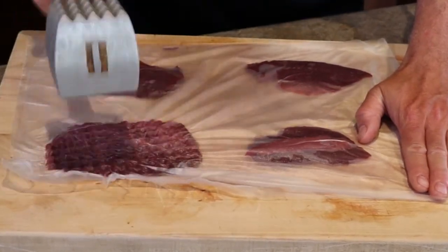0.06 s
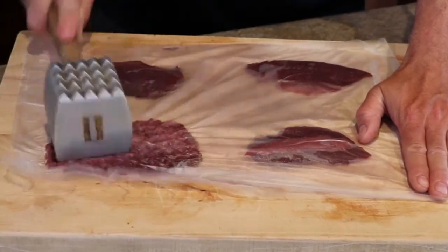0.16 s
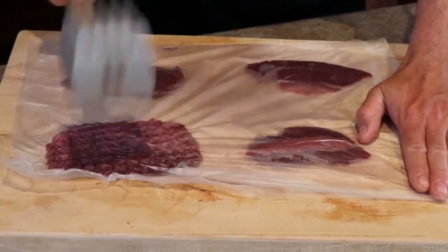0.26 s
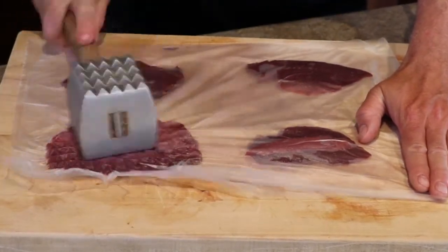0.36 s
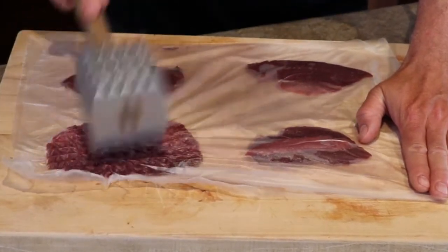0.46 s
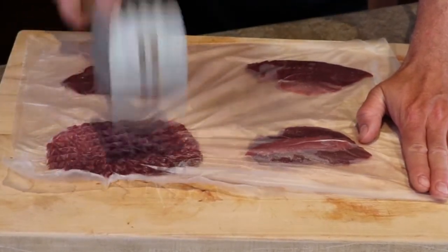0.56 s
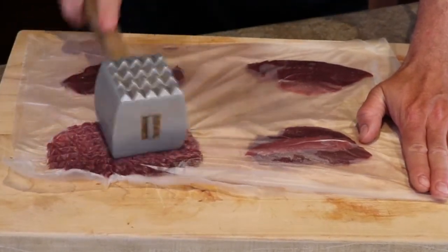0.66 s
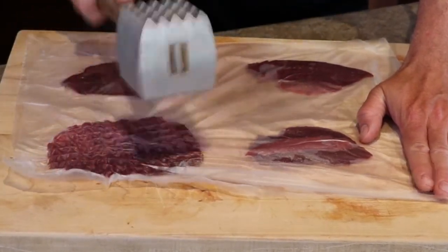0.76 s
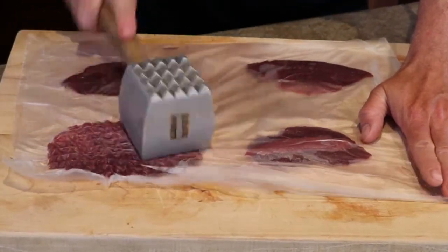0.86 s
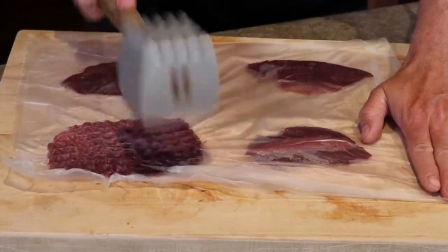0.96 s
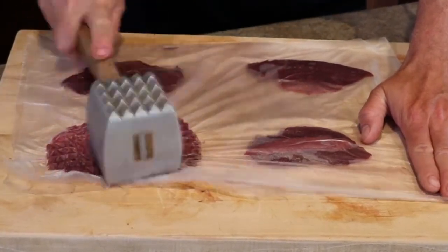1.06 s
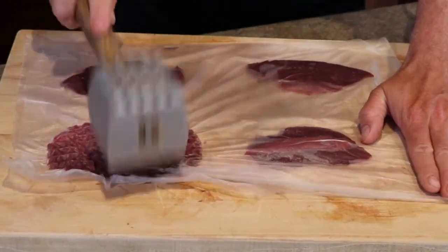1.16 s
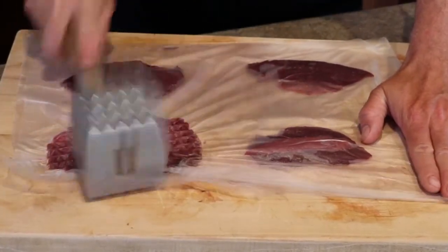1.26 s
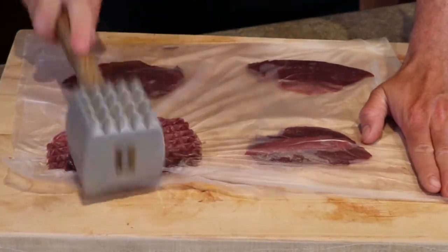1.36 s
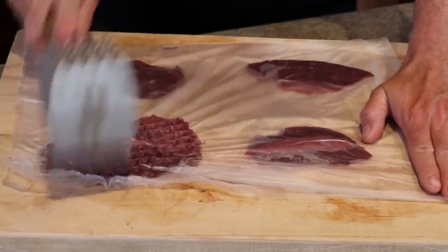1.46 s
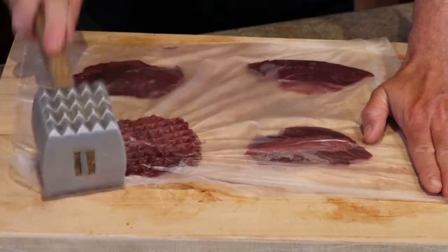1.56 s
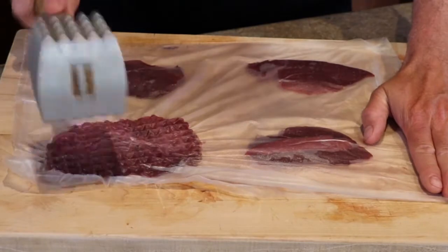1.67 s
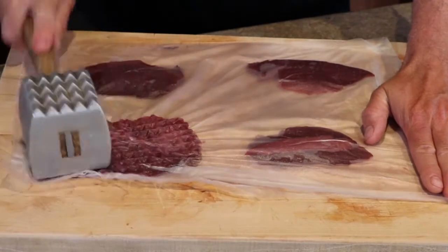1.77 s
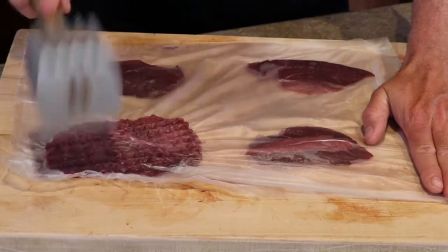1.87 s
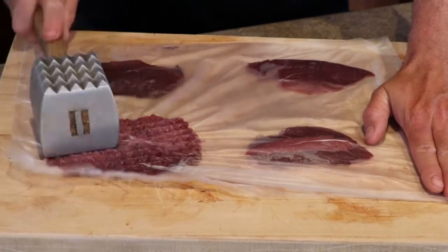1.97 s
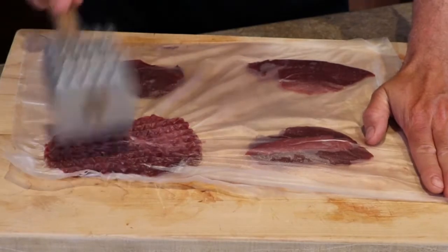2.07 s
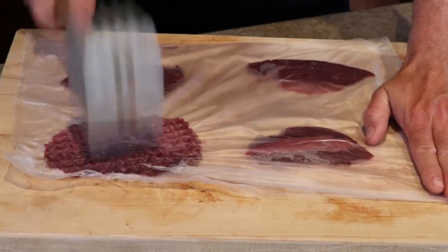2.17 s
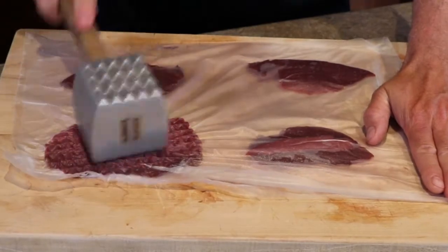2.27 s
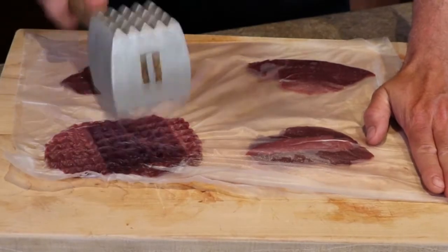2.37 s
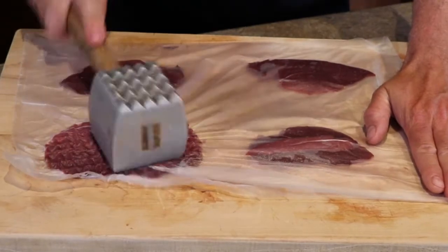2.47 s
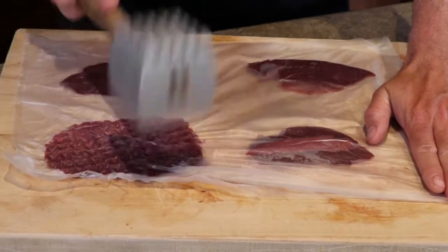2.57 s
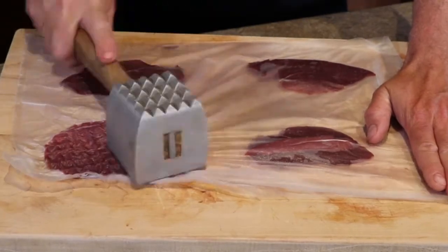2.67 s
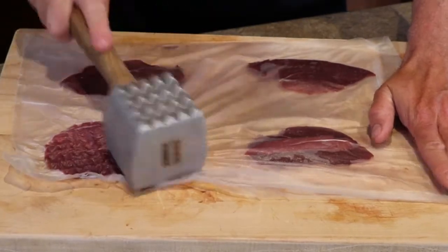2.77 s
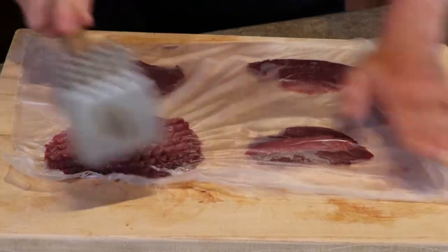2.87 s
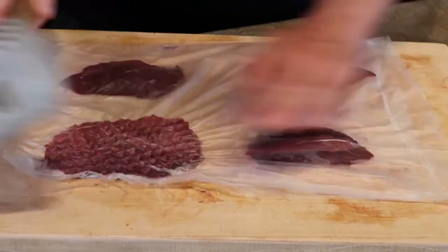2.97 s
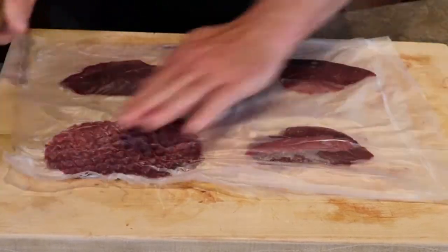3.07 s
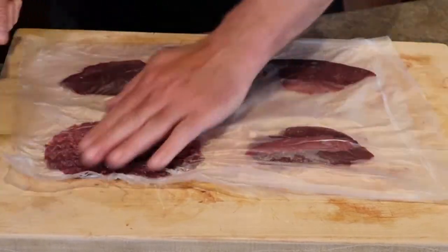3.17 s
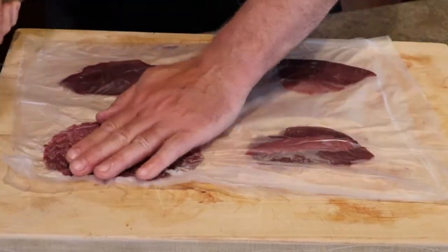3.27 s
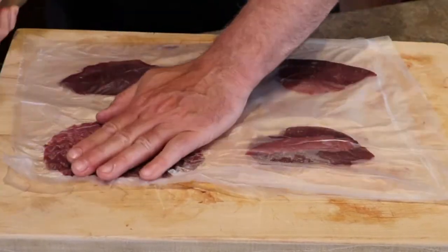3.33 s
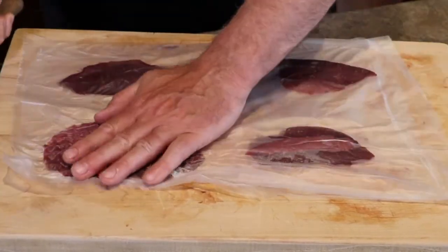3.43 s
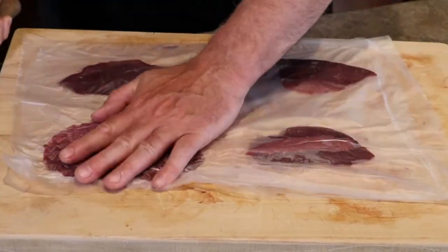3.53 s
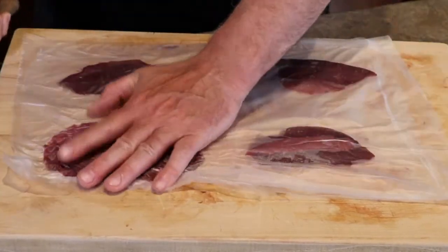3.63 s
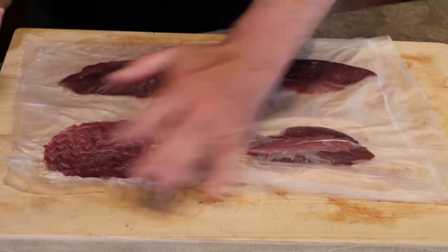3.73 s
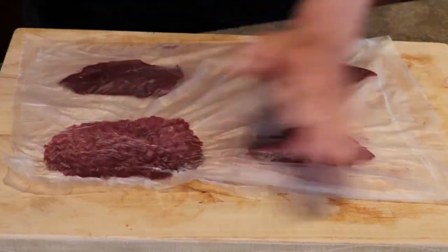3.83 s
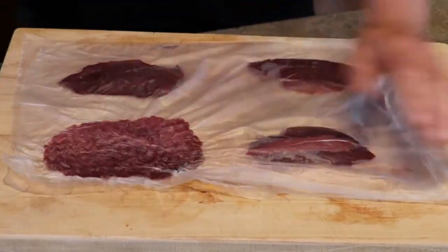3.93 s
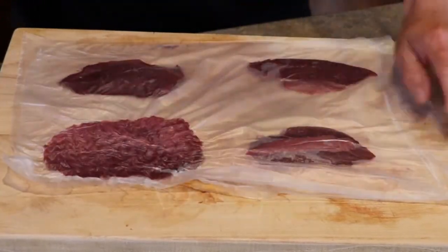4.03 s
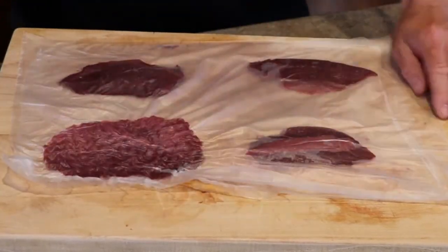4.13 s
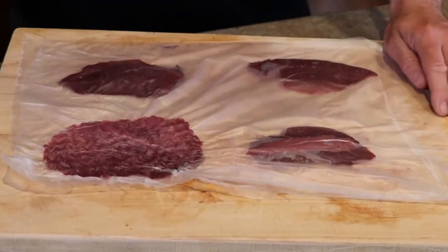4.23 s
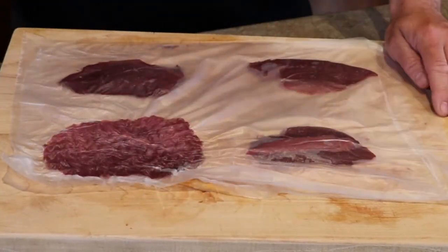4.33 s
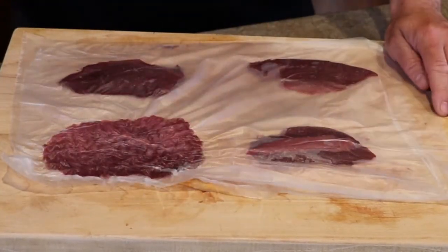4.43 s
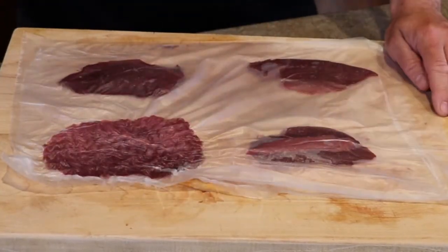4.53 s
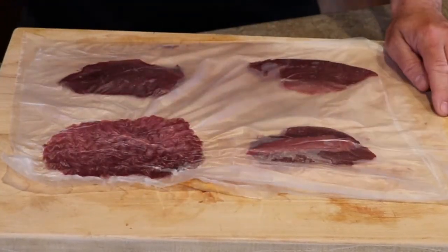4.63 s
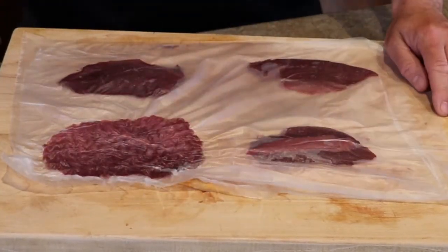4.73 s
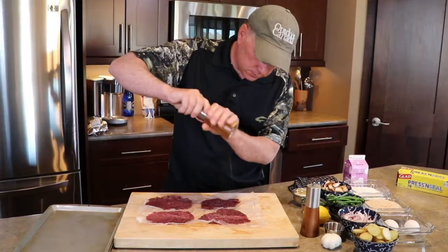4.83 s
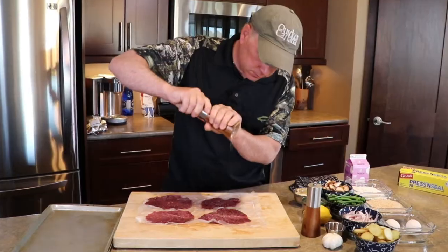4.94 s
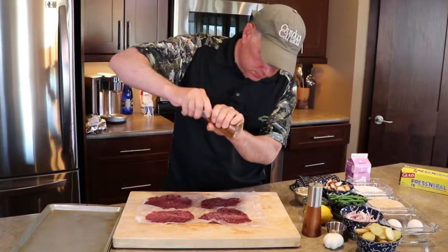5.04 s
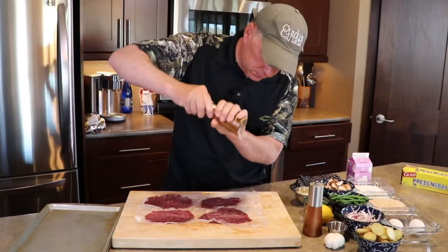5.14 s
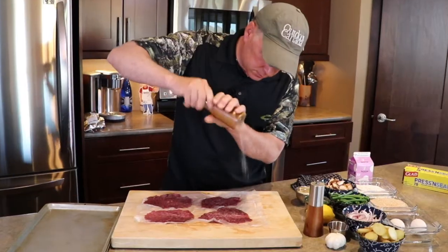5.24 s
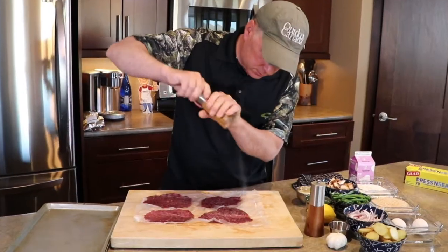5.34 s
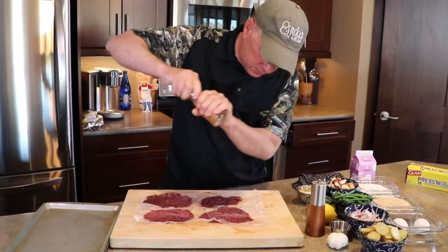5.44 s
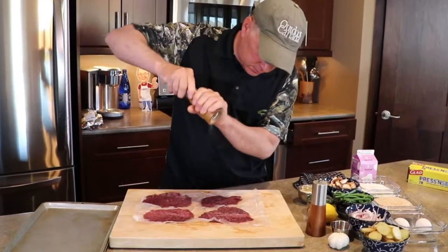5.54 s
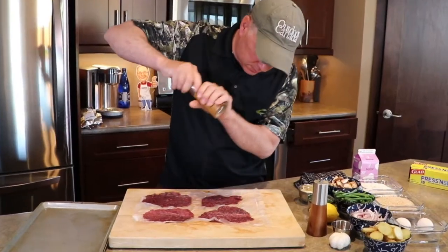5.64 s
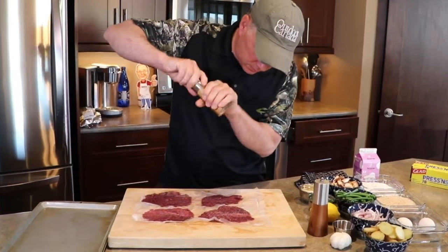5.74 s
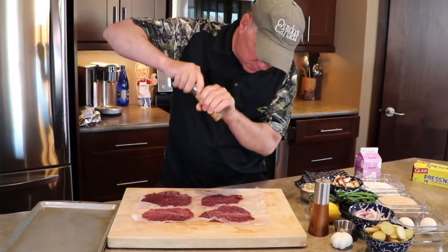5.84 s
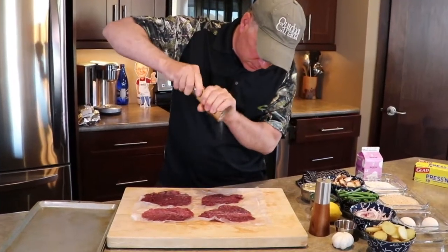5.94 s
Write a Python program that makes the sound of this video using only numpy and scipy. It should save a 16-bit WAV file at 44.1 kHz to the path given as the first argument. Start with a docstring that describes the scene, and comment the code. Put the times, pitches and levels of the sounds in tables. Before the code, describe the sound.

From the start, a toothed metal mallet pounds meat under plastic film on a wooden board: about a dozen hard, even blows, a little over four per second, the last at 2.7 seconds. Each combines a smack, a woody knock and a short metallic ring, with a faint wet squelch as the teeth lift. The blows overload the microphone, so the kitchen's reverberation ducks and swells back after each one. From about 2.9 seconds the film gives small, sharp snaps; between 3.3 and 3.8 a hand presses it flat with a much quieter crinkle and soft squish, and a few ticks trail off by 4.3. After a short lull, a pepper mill turns twice, cracking peppercorns crisply at about 5.0 to 5.1 and 5.8 to 5.9 seconds, with light gritty rubbing in between. Faint room hiss and appliance hum lie underneath throughout.

```python
"""Hard, ringing blows in a live kitchen, then crinkling film, then two turns of a pepper mill.
A toothed metal mallet pounds duck under plastic film on a wooden board; board and head ring.
The blows overload the microphone; its limiter ducks their reverberation, which swells back each time.
A hand presses the film flat, snapping its creases, and the mill's burrs crack peppercorns."""
import sys
import numpy as np
from scipy import signal
from scipy.io import wavfile

SR = 44100
rng = np.random.default_rng(int(sys.argv[2]) if len(sys.argv) > 2 else 0)


def file_out(sig):
    """Save sig as 16-bit WAV at sys.argv[1]."""
    # one column per channel
    cols = np.atleast_2d(sig).T
    # limit, then scale
    lim = np.clip(cols, -1, 1)
    pcm = np.round(lim * 32767).astype(np.int16)
    wavfile.write(sys.argv[1], SR, pcm)


N = 264600
TIME_S = np.arange(N) / SR
LEAD_IN_SAMPLES = round(.1 * SR)  # the first blow lands before time zero

# Spectra. Each row: frequency in Hz, relative density in dB.
AIR_SPECTRUM = [(15, -33), (25, -6.5), (263, -7.5), (344, -9.5), (476, -7), (575, -7), (695, -10.5),
                (754, -13), (936, -13), (1290, -14.5), (4610, -25), (6920, -24.5), (9320, -25.5),
                (16000, -31.5)]  # room hiss
RUMBLE_SPECTRUM = [(15, -7), (35, -6), (80, -6), (140, -13.5), (250, -20), (1000, -64)]  # hands turning the mill
JOLT_SPECTRUM = [(30, -14), (70, 4), (120, 5), (200, -15), (350, 0), (1000, -41)]  # a crack jolting the hands
GRIT_SPECTRUM = [(200, -6), (1000, -23), (2200, -11), (3500, -4), (6000, 4), (9000, 1.5), (12500, 0.5),
                 (16000, -19)]  # grit between the burrs
MILL_BODY_SPECTRUM = [(50, -18), (130, -3), (300, -15), (520, -13), (700, -6.5), (890, -2), (1150, -5.5),
                      (1600, -5), (2100, 6.5), (2600, -1), (4000, -8), (16000, -32)]  # the mill's wooden body
CRACK_SPECTRUM = [(300, -7), (1500, -9), (2300, 4), (4000, -3), (8000, 6.5), (12000, 0), (16000, -6)]  # a peppercorn breaking
FILM_SPECTRUM = [(1470, -21), (2500, -32), (2990, -17), (3770, -19), (4080, -6), (5650, 1.5), (7020, 3.5),
                 (8940, -3), (15200, -11.5), (16000, -13)]  # plastic film crinkling
SQUISH_SPECTRUM = [(500, -5.5), (1000, -4), (1500, 7), (2200, 2.5), (3500, -2.5), (6000, -10),
                   (16000, -44.5)]  # meat under the palm
SQUELCH_SPECTRUM = [(300, -6), (1200, -5.5), (2000, 6.5), (3300, -1.5), (5000, -8.5), (8000, -17),
                    (16000, -40.5)]  # meat letting go of the teeth
SMACK_SPECTRUM = [(40, -22), (150, 0), (400, 6), (620, 2.5), (1000, -2), (1220, -5.5), (1490, -4),
                  (2050, -7.5), (3200, -18.5), (5000, -22), (7500, -25), (12000, -34.5), (16000, -60)]  # meat and film squashed on wood
REVERB_SPECTRUM = [(60, 7.6), (300, 2.1), (900, 5.8), (2000, 2.2), (5000, 2.65), (9000, 6.3),
                   (16000, 11.26)]  # kitchen reflections

# Appliance hum. Each row: frequency in Hz, relative level in dB.
HUM_TONES = [(59.5, -62.5), (247.6, -67), (414.5, -63.5), (473.7, -62)]
# Kitchen decay. Each row: frequency in Hz, T60 in seconds.
REVERB_T60 = [(60, 0.5), (250, 0.5), (700, 0.66), (2000, 0.71), (5000, 0.68), (9000, 0.334), (16000, 0.283)]
# Standing waves. Each row: frequency in Hz, relative level in dB.
KITCHEN_MODES = [(119, 9), (238, 1.5), (298, 3.5), (337, 1), (383, -0.5), (517, -6), (563, 0.5), (592, 1),
                 (618, -10), (642, 4), (817, -2), (884, 2), (1028, 7), (1060, -9.5), (1128, -7), (1432, 8),
                 (1487, 0), (1530, 1), (1870, -21)]
# Nearby surfaces. Each row: delay in seconds, gain in dB.
ECHOES = [(.0063, -17.5), (0.01, -16), (0.013, -7.5), (.0192, -20.5), (0.024, -18)]
# Hands turning the mill. Each row: start and length in seconds, relative rumble in dB.
MILL_GRIPS = [(5.338, 0.25, -45), (5.862, 0.042, -38.5)]
# Mill strokes. Each row: start and length in seconds, relative hiss and crunch in dB.
MILL_TWISTS = [(5.042, 0.014, -37, -35.5), (5.104, 0.024, -41, -25.5), (5.384, 0.099, -41, -56),
               (5.552, 0.03, -46.5, -64), (5.728, 0.05, -41.5, -55), (5.87, 0.032, -37, -30.5),
               (5.935, 0.045, -41.5, -52)]
# Loudest peppercorns. Each row: start in seconds, relative peaks of snap and body knock in dB.
CORN_CRACKS = [(5.009, -22, -40), (5.0415, -18.5, -41), (5.0482, -21, -23.5), (5.059, -24, -35),
               (5.0905, -20, -20.5), (5.1008, -16, -12.5), (5.1108, -29, -22), (5.1286, -13, -33),
               (5.3542, -29.5, -54), (5.4584, -40, -35), (5.8177, -31, -58), (5.8517, -28, -34),
               (5.863, -34, -22), (5.871, -14, -19.5), (5.8959, -24, -21.5), (5.916, -16, -42)]
# The hand lands, pushes, rests, lifts, settles and shifts.
# Each row: start and length in seconds, relative crinkle and squish in dB.
HAND_TOUCHES = [(3.283, 0.045, -39, -45.5), (3.329, 0.032, -32, -41), (3.385, 0.42, -40.5, -51.5),
                (3.77, 0.0094, -31, -41), (4.177, 0.03, -47.5, -49), (4.266, 0.0022, -63, -54)]
# Loudest creases. Each row: start in seconds, relative peak in dB.
FILM_CREASES = [(2.9404, -26), (3.1907, -34), (3.2794, -13.5), (3.3011, -26), (3.328, -19), (3.4037, -20),
                (3.6733, -24), (3.829, -33), (3.9943, -30.5)]
# Board and mallet modes. Each row: frequency in Hz, relative level in dB, T60 in seconds.
STRUCK_MODES = [(68.3, -25, 0.31), (121, -23, 0.24), (181.5, -15.5, .09), (239, -19, 0.11),
                (291.8, -10.5, 0.11), (337.1, -5.5, 0.085), (387.6, -8, 0.06), (503.3, -12, 0.054),
                (525, -10, 0.15), (609.6, -9, 0.067), (807.3, -10, 0.08), (952, -14, 0.055),
                (1093, -23, 0.077), (1393, -20.5, 0.14), (1526.4, -3.5, 0.045), (1910, -15, 0.047),
                (2803, -22, 0.031), (3553, -19.5, 0.021)]
# Blows: thin meat lets the board knock, teeth reaching wood ring the head, wet meat clings.
# Each row: start in seconds, then relative force, board knock, head ring and wet peel in dB.
MALLET_BLOWS = [(-0.075, 1, 2, -3.5, -47), (0.168, 0.5, -5, -13.5, -42), (0.4049, 0.1, -8, -11.5, -67),
                (0.6432, 0, -0.5, -0.5, -45), (0.8674, -0.5, 6, -0.5, -46), (1.1008, -3.5, 1.5, 3.5, -41),
                (1.3245, -3, -3.5, 8.5, -40.5), (1.546, -2.5, 2.5, 7.5, -43), (1.7767, -4.5, 2, -1.5, -54),
                (2.0006, -1, -1.5, -8, -44), (2.2382, -1, -7.5, 3.5, -41), (2.4637, -5, 1, -1, -67),
                (2.709, 0.5, 4.5, -0.5, -36)]
# Output level. Each row: time in seconds, gain in dB.
OUTPUT_GAIN = [(2.2, 0), (2.46, 1.3), (2.71, 2.6)]


def amp(db):
    return 10 ** (np.asarray(db) / 20)


def unit_rms(x):
    return x / np.sqrt(np.mean(x ** 2) + 1e-20)


def log_interp(points, hz):
    """Curve value on a log-frequency axis."""
    points_hz, values = np.transpose(points)
    return np.interp(np.log(hz + 1), np.log(points_hz + 1), values)


def add(mix, start_s, sound):
    part = mix[round(start_s * SR):][:len(sound)]
    part += sound[:len(part)]


def colour(x, spectrum, size=4096):
    """Minimum-phase filter; attacks stay sharp."""
    log_gain = np.log(amp(log_interp(spectrum, abs(np.fft.fftfreq(size, 1 / SR)))))
    taps = np.fft.ifft(np.exp(np.conj(signal.hilbert(log_gain)))).real
    return signal.oaconvolve(x, taps[:size // 2])[:len(x)]


def noise(spectrum, samples=N):
    return unit_rms(colour(rng.standard_normal(samples), spectrum))


def burst(t, decay_s):
    return rng.standard_normal(len(t)) * np.exp(-t / decay_s)


def grains(spectrum, per_s, spread_db, decay_s):
    """Dense stream of tiny, unequal snaps."""
    sizes = amp(spread_db * np.minimum(rng.exponential(1, N), 4))
    fires = rng.random(N) < per_s / SR
    power = signal.lfilter([1], [1, -np.exp(-2 / (decay_s * SR))], (sizes * fires) ** 2)
    return unit_rms(colour(np.sqrt(power) * rng.standard_normal(N), spectrum))


def snaps(spectrum, per_s, spread_db, decay_s):
    """Separate, unequal snaps at uneven intervals."""
    out, t = np.zeros(N), np.arange(SR // 80) / SR
    for k in range(int(per_s * N / SR)):
        start_s = (k + rng.random()) / per_s
        add(out, start_s, amp(spread_db * rng.uniform(-1.5, 1.6)) * burst(t, decay_s))
    return unit_rms(colour(out, spectrum))


def strokes(rows, attack_s, release_s):
    """Swell, hold, decay: one envelope per level column."""
    gains = np.zeros((len(rows[0]) - 2, N))
    for start_s, length_s, *levels_db in rows:
        near = abs(TIME_S - start_s) < length_s + .5
        t = TIME_S[near] - start_s
        shape = np.exp(np.minimum(t, 0) / attack_s - np.maximum(t - length_s, 0) / release_s)
        gains[:, near] = np.maximum(gains[:, near], amp(levels_db)[:, None] * shape)
    return gains


def room_tone(air_db=-55, hum_db=-3):
    """Soft hiss and appliance hum."""
    hum = sum(amp(db) * np.sqrt(2) * np.sin(2 * np.pi * (hz * TIME_S + rng.random()))
              for hz, db in HUM_TONES)
    return amp(air_db) * noise(AIR_SPECTRUM) + amp(hum_db) * hum


def kitchen_reverb(x, build_s=0.0069):
    """Dense reflections, each band dying at its own rate."""
    hz, t, bands = signal.stft(rng.standard_normal(SR), SR, nperseg=256)
    decay_db = 60 * t / log_interp(REVERB_T60, hz)[:, None]
    bands = bands * amp(log_interp(REVERB_SPECTRUM, hz)[:, None] - decay_db)
    tail = signal.istft(bands, SR, nperseg=256)[1][:SR]
    tail *= 1 - np.exp(-(TIME_S[:SR] / build_s) ** 2)
    return signal.fftconvolve(x, tail / np.linalg.norm(tail))[:len(x)]


def standing_waves(x):
    """The strongest room modes ring on at their own pitches."""
    hz, db = np.transpose(KITCHEN_MODES)[:, :, None]
    t = TIME_S[:SR]
    envelopes = amp(db - 60 * t / log_interp(REVERB_T60, hz))
    tail = (envelopes * np.sin(2 * np.pi * (hz * t + rng.random(hz.shape)))).sum(0)
    return signal.fftconvolve(x, tail / np.linalg.norm(tail))[:len(x)]


def first_echoes(x):
    """Counter, cabinets and cook reflect each knock and thicken it."""
    out = np.zeros(len(x))
    for delay_s, db in ECHOES:
        add(out, delay_s, amp(db) * x)
    return out


def pepper_mill(crack_db=-1, crumble_db=-10, body_db=3, jolt_db=-28):
    """Corns burst between the burrs, knock the body and jolt the hands; grit rubs in between."""
    grit = amp(-2) * grains(GRIT_SPECTRUM, per_s=1300, spread_db=4.5, decay_s=0.0014)
    crunch = amp(-5) * grains(MILL_BODY_SPECTRUM, per_s=1700, spread_db=4.5, decay_s=0.0027)
    chips = amp(-9.5) * snaps(CRACK_SPECTRUM, per_s=50, spread_db=4.5, decay_s=0.00033)
    rumble = amp(-2) * noise(RUMBLE_SPECTRUM)
    rubbing, biting = strokes(MILL_TWISTS, attack_s=0.012, release_s=0.017)
    gripping, = strokes(MILL_GRIPS, attack_s=0.012, release_s=0.017)
    out = rubbing * (grit + chips) + biting * crunch + gripping * rumble
    t = np.arange(SR // 10) / SR
    for start_s, snap_db, knock_db in CORN_CRACKS:
        fracture = burst(t, decay_s=0.00078)
        crumble = amp(crumble_db) * burst(t, decay_s=0.0071)
        snap = colour(fracture + crumble, CRACK_SPECTRUM)
        knock = colour(burst(t, decay_s=0.0022), MILL_BODY_SPECTRUM)
        jolt = colour(burst(t, decay_s=0.0046), JOLT_SPECTRUM)
        peaks_db = snap_db + crack_db, knock_db + body_db, (snap_db + knock_db) / 2 + jolt_db
        for sound, peak_db in zip((snap, knock, jolt), peaks_db):
            add(out, start_s + 0.00091, amp(peak_db) * sound / abs(sound).max())
    return out


def pressed_film(crease_db=-2, crease_decay_s=0.00043):
    """Film crinkles and meat squishes under the palm; single creases snap."""
    crinkle = amp(-1) * grains(FILM_SPECTRUM, per_s=1400, spread_db=3.5, decay_s=.0008)
    squish = amp(3) * grains(SQUISH_SPECTRUM, per_s=900, spread_db=2, decay_s=.0015)
    small_creases = amp(-7) * snaps(FILM_SPECTRUM, per_s=24, spread_db=5, decay_s=crease_decay_s)
    sliding, pressing = strokes(HAND_TOUCHES, attack_s=0.0052, release_s=0.018)
    out = sliding * (crinkle + small_creases) + pressing * squish
    t = np.arange(SR // 40) / SR
    for start_s, db in FILM_CREASES:
        snap = colour(burst(t, crease_decay_s), FILM_SPECTRUM)
        add(out, start_s + 0.0013, amp(db + crease_db) * snap / abs(snap).max())
    return out


def peel(delay_s=0.097, spread_s=0.077, film_db=-59, wet_db=2):
    """Film ticks and wet meat squelches as they let go of the rising teeth."""
    lifting, clinging = np.zeros((2, LEAD_IN_SAMPLES + N))
    lift = np.exp(-((TIME_S[:SR // 2] - delay_s) / spread_s) ** 2)
    for start_s, *_, peel_db in MALLET_BLOWS:
        hit_s = start_s + LEAD_IN_SAMPLES / SR
        add(lifting, hit_s, amp(film_db) * lift)
        add(clinging, hit_s, amp(wet_db + peel_db) * lift)
    ticks = grains(FILM_SPECTRUM, per_s=850, spread_db=1.5, decay_s=.0006)
    squelch = grains(SQUELCH_SPECTRUM, per_s=1300, spread_db=3.5, decay_s=0.0016)
    return lifting[LEAD_IN_SAMPLES:] * ticks + clinging[LEAD_IN_SAMPLES:] * squelch


def board_settling(x, delay_s=.081, cutoff_hz=450, bump_db=-9):
    """A dull second bump as the board settles after each blow."""
    out = np.zeros(len(x))
    dull = signal.sosfilt(signal.butter(2, cutoff_hz, fs=SR, output="sos"), x)
    add(out, delay_s, amp(bump_db) * dull)
    return out


def struck_ring(t, detune=0.011, spot_db=1.5):
    """Board and mallet modes decay; each blow hits a new spot, which shifts and reweights them."""
    hz, db, t60_s = np.transpose(STRUCK_MODES)[:, :, None]
    shift, spot = rng.standard_normal((2, len(hz), 1))
    polarity = (-1) ** np.arange(len(hz))[:, None]
    envelopes = amp(db + spot_db * spot - 60 * t / t60_s)
    return (polarity * envelopes * np.sin(2 * np.pi * hz * (1 + detune * shift) * t)).sum(0)


def blow_spectrum(force_db, knock_db, ring_db, board_hz=915, head_hz=1680, treble_hz=2500):
    """Force lifts everything, treble most; board and head each have their own band."""
    hz = np.geomspace(40, 16000, num=60)
    board_octaves, head_octaves = 0.74, 0.45
    board = np.exp(-(np.log2(hz / board_hz) / board_octaves) ** 2)
    head = np.exp(-(np.log2(hz / head_hz) / head_octaves) ** 2)
    treble = hz ** 2 / (hz ** 2 + treble_hz ** 2)
    bright_db = 0.62 * force_db - 0.95
    return list(zip(hz, force_db + knock_db * board + ring_db * head + bright_db * treble))


def mallet(squeeze_s=0.0014, smack_db=-2, smack_decay_s=0.005, fizz_db=-25, push_db=-15):
    """The teeth crush film and meat, then stop on the board, which rings with the head."""
    rings, smacks, radiated = np.zeros((3, LEAD_IN_SAMPLES + N))
    t = np.arange(SR // 4) / SR
    squeeze = np.linspace(0, 1, round(squeeze_s * SR))
    push = amp(push_db) * np.sin(np.pi * squeeze)
    # summed over all directions, the smack reaches the walls with a smooth spectrum
    click = colour(signal.unit_impulse(len(t)), SMACK_SPECTRUM)
    click /= np.linalg.norm(click)
    for start_s, force_db, knock_db, ring_db, _ in MALLET_BLOWS:
        hit_s = start_s + LEAD_IN_SAMPLES / SR
        tone = blow_spectrum(force_db, knock_db, ring_db)
        smack = noise(SMACK_SPECTRUM, len(t)) * np.exp(-t / smack_decay_s)
        add(rings, hit_s, colour(struck_ring(t), tone))
        add(smacks, hit_s, amp(smack_db) * colour(smack, tone))
        add(radiated, hit_s, colour(click, tone))
        # air escapes from under the film just before the stop
        fizz = amp(fizz_db) * noise(FILM_SPECTRUM, len(t))[:len(squeeze)]
        add(smacks, hit_s - squeeze_s, squeeze * (fizz - push))
    room = amp(-7.5) * kitchen_reverb(rings) + amp(18) * kitchen_reverb(radiated)
    room += amp(1) * standing_waves(radiated)
    return rings + smacks + first_echoes(rings) + board_settling(rings) + room


def limiter(x, threshold_db=-9, attack_s=.01, recovery_db_per_s=120, ceiling=.62):
    """Too slow for the attack: the first cycles clip, then the tail ducks and swells back."""
    over_db = np.maximum(20 * np.log10(abs(x) + 1e-9) - threshold_db, 0)
    recovery_db = recovery_db_per_s * np.arange(len(x)) / SR
    held_db = np.maximum.accumulate(over_db + recovery_db) - recovery_db
    pole = np.exp(-1 / (attack_s * SR))
    ducked = x / amp(signal.lfilter([1 - pole], [1, -pole], held_db))
    return ducked / (1 + (ducked / ceiling) ** 6) ** (1 / 6)


def scene(drive_db=4, handwork_db=-2.5, film_send_db=-14, mill_send_db=-11):
    """Pounding, pressing and grinding in one room; only the blows pass through the limiter."""
    blows = limiter(amp(drive_db) * mallet())[LEAD_IN_SAMPLES:]
    film = amp(handwork_db) * pressed_film()
    mill = amp(handwork_db) * pepper_mill()
    room = kitchen_reverb(amp(film_send_db) * film + amp(mill_send_db) * mill)
    return (blows + peel() + film + mill + room + room_tone())[None]


def record(dry, low_cut_hz=40, high_cut_hz=16050):
    """Low cut, a small gain rise over the last blows, band limit."""
    x = signal.sosfilt(signal.butter(2, low_cut_hz, "highpass", fs=SR, output="sos"), dry[0])
    x = x * amp(np.interp(TIME_S, *np.transpose(OUTPUT_GAIN)))
    lowpass = signal.firwin(255, high_cut_hz, window=("kaiser", 9), fs=SR)
    return signal.oaconvolve(x, lowpass, "same")[None]


dry = scene()
out = record(dry)
file_out(out)
```